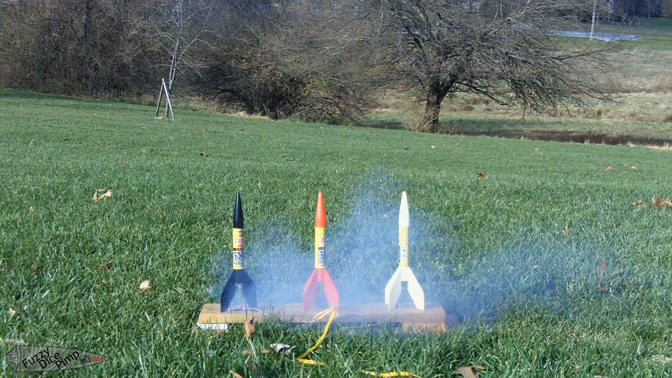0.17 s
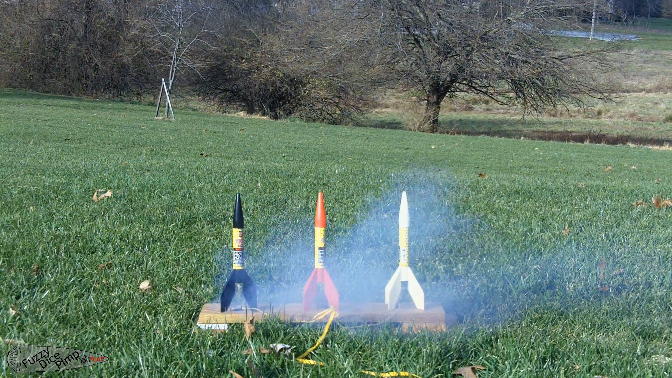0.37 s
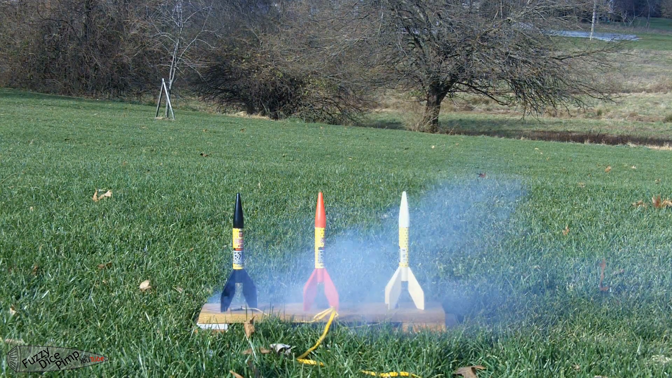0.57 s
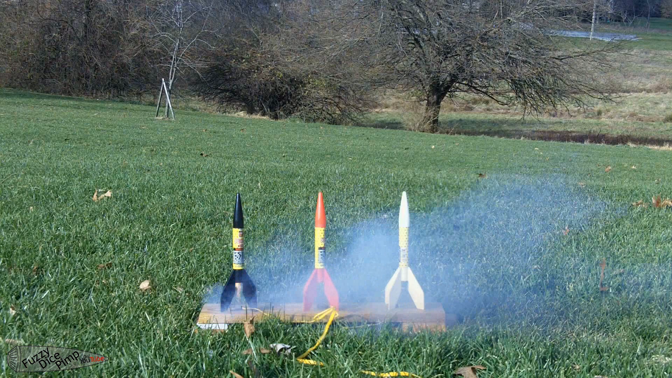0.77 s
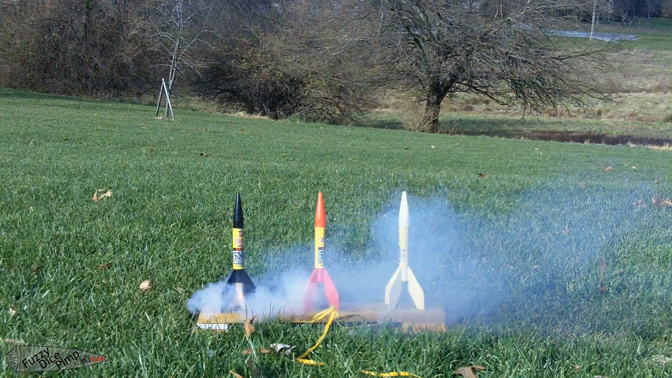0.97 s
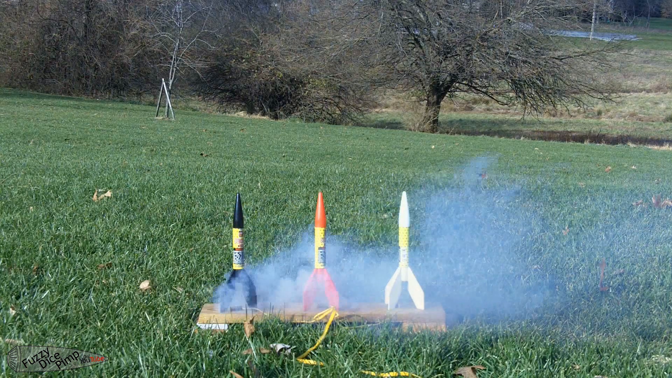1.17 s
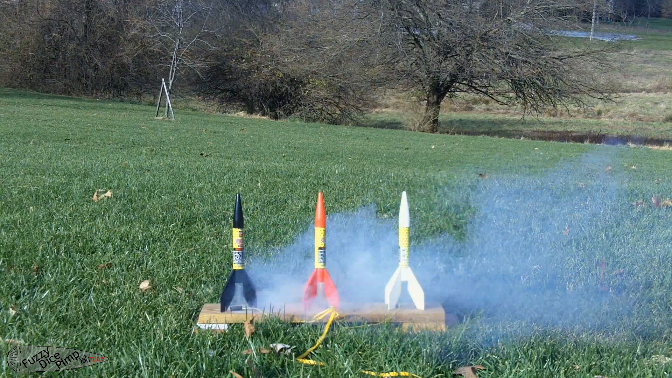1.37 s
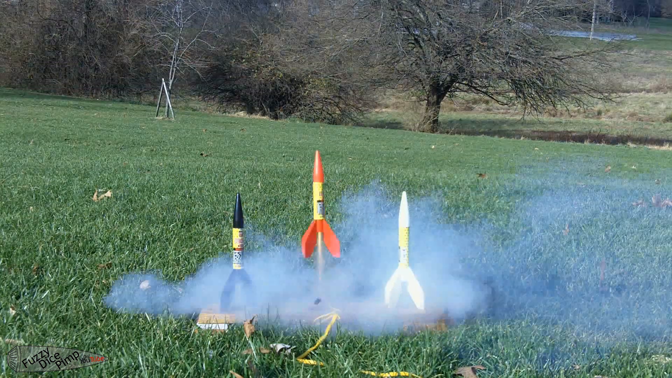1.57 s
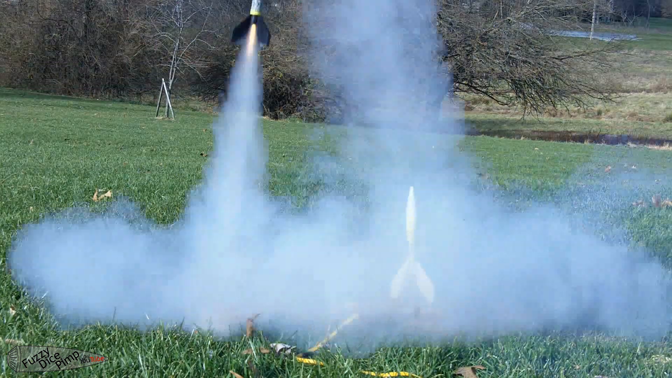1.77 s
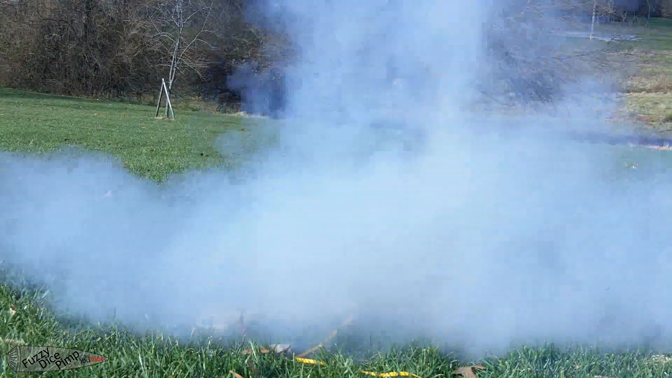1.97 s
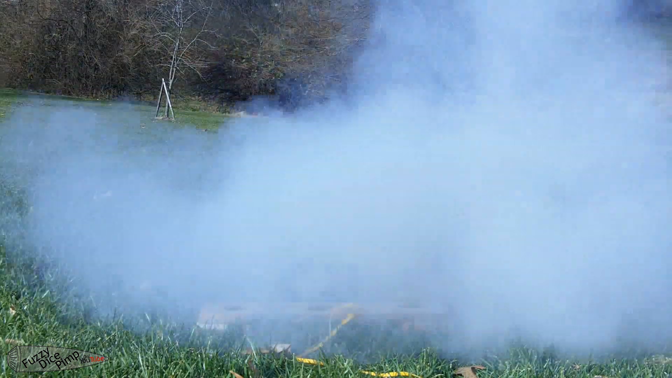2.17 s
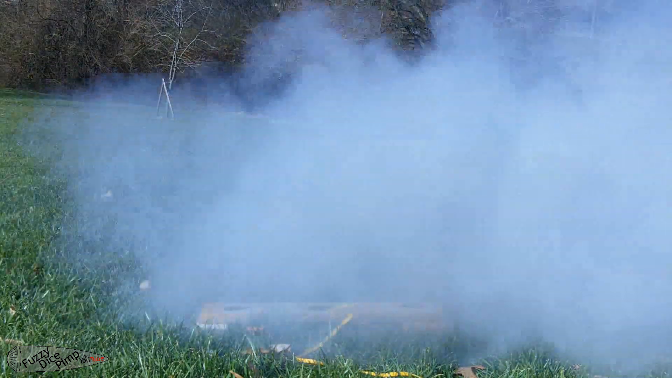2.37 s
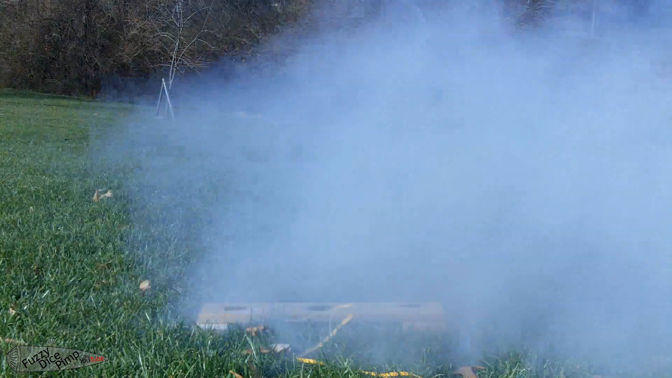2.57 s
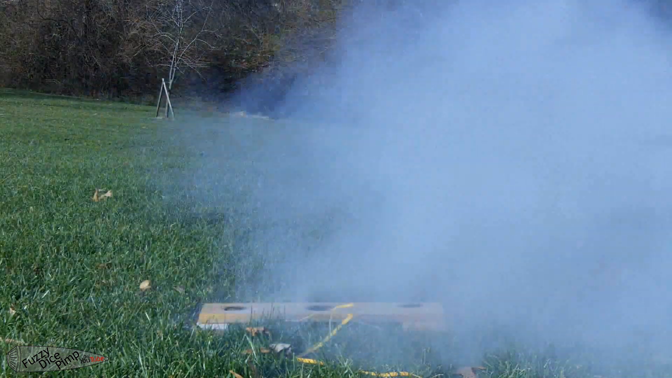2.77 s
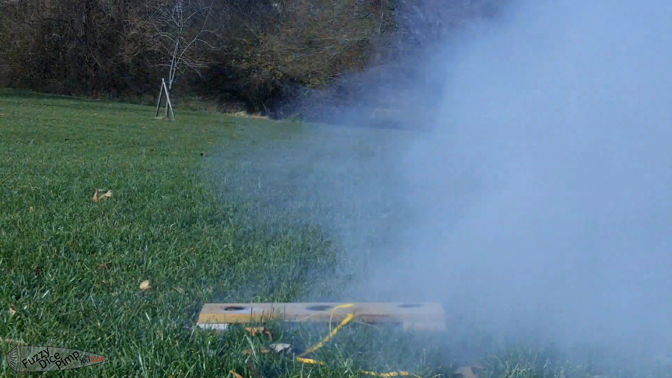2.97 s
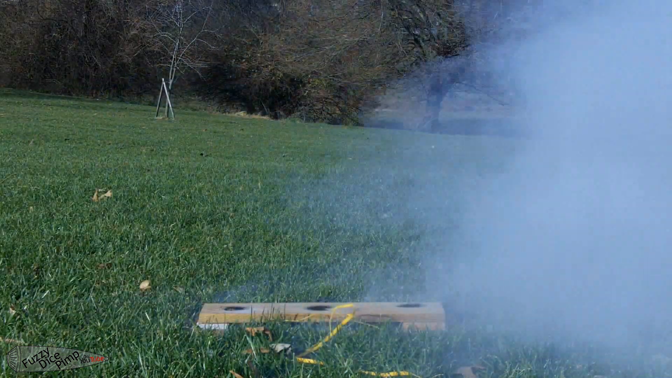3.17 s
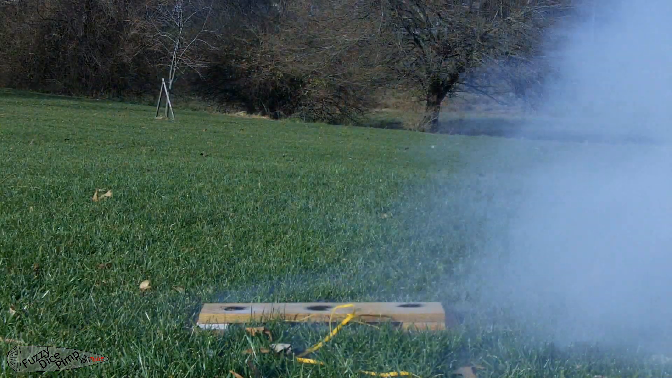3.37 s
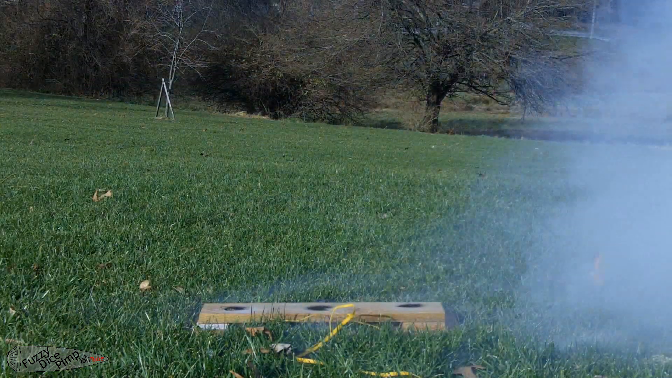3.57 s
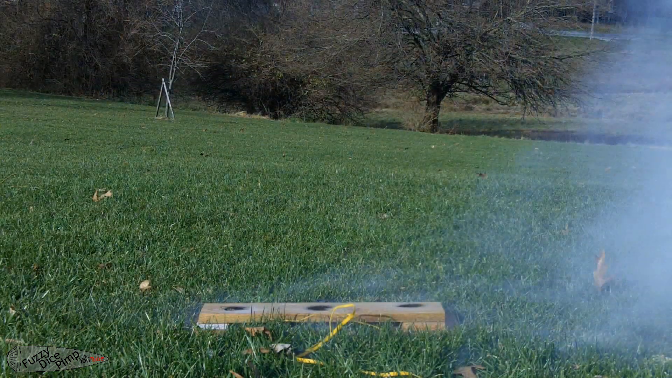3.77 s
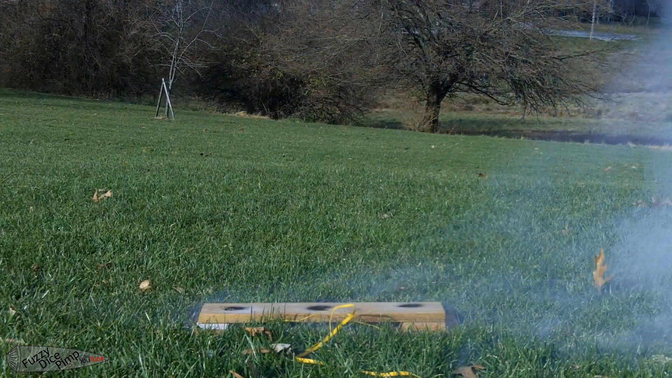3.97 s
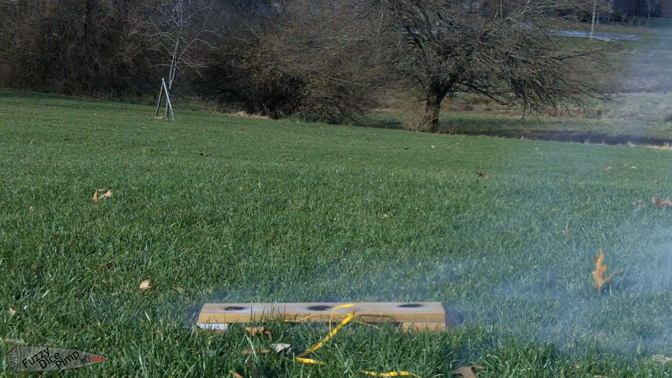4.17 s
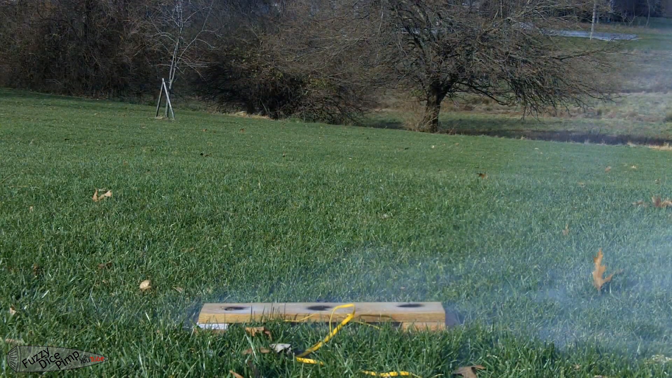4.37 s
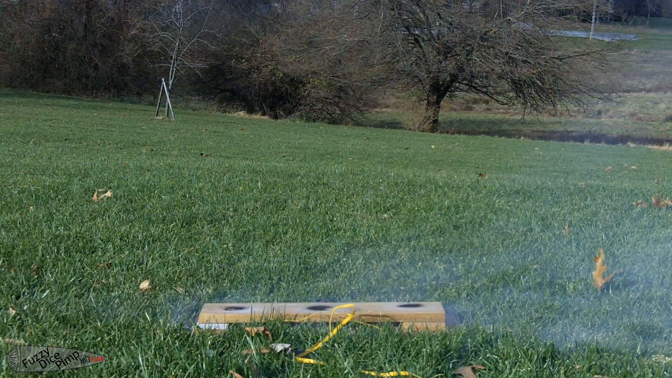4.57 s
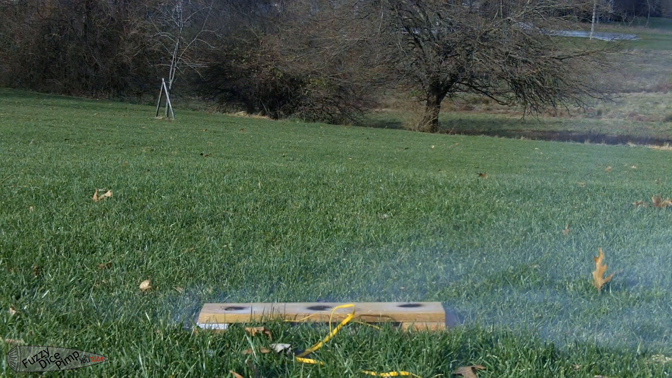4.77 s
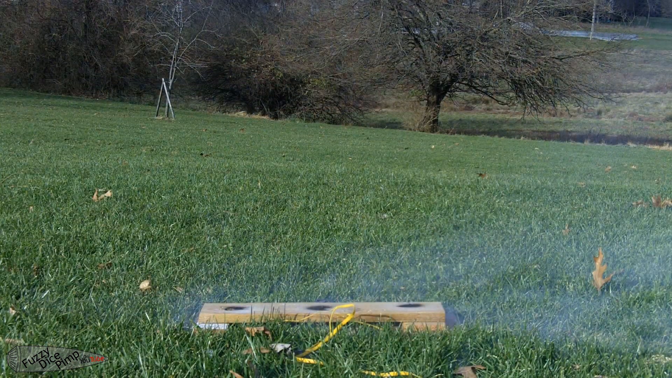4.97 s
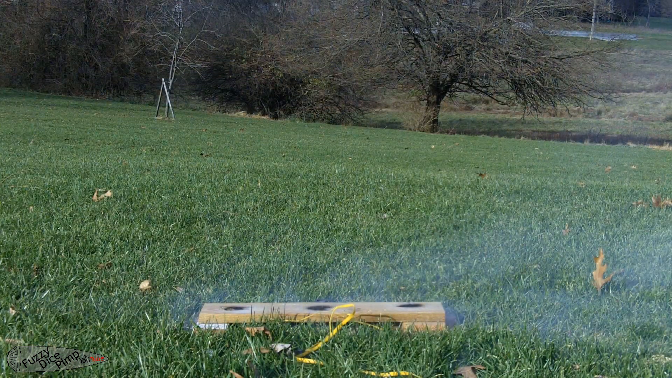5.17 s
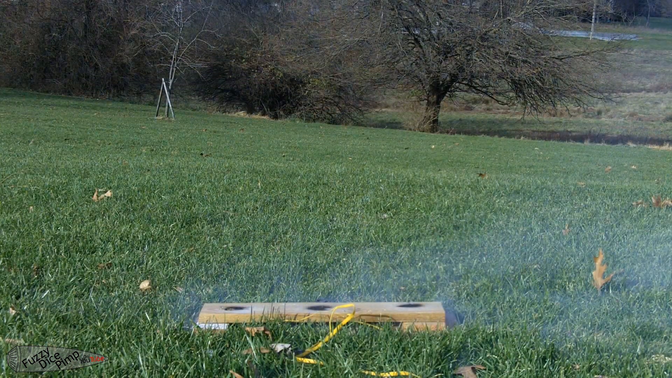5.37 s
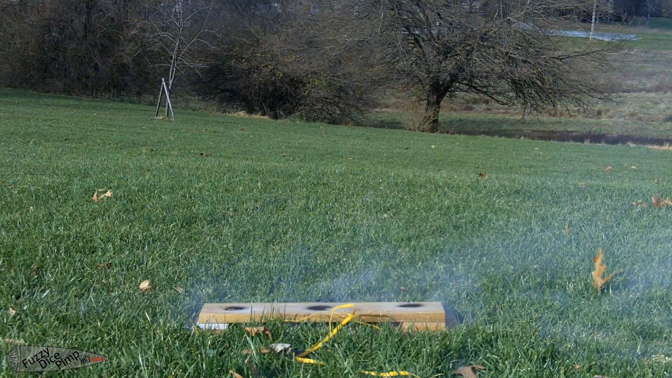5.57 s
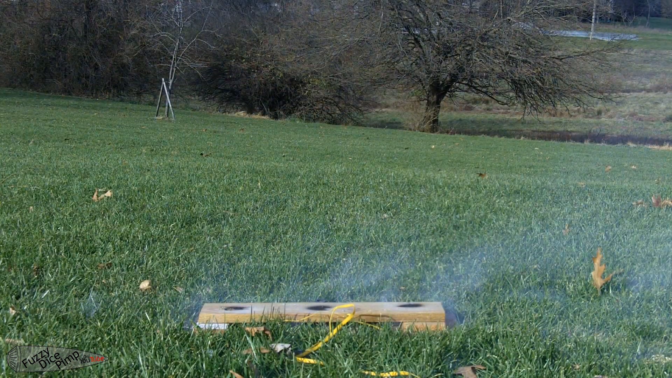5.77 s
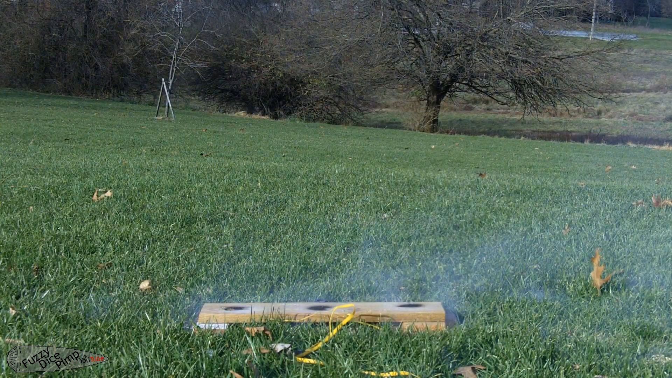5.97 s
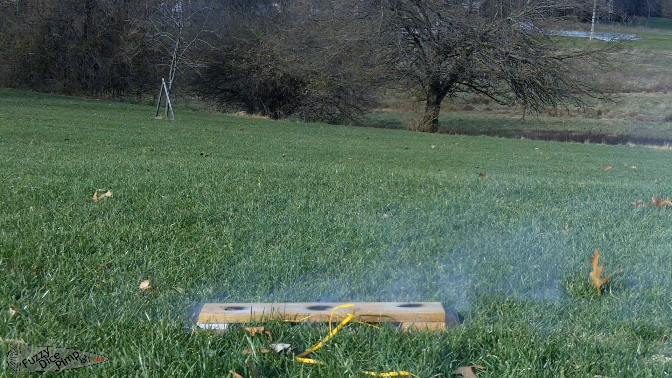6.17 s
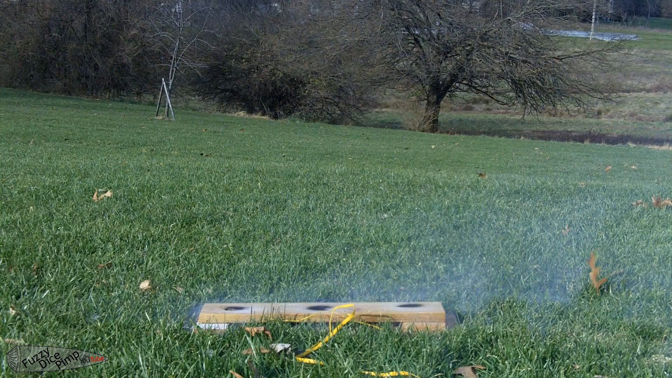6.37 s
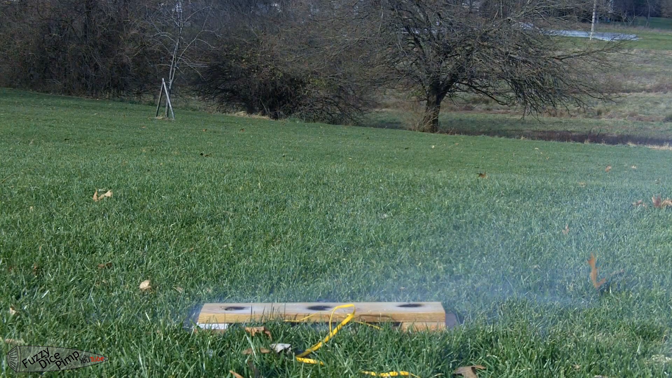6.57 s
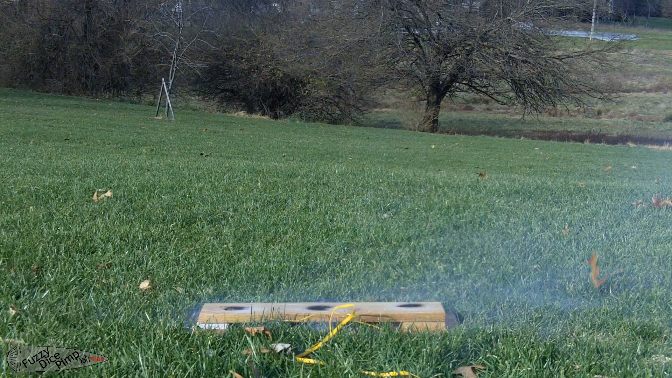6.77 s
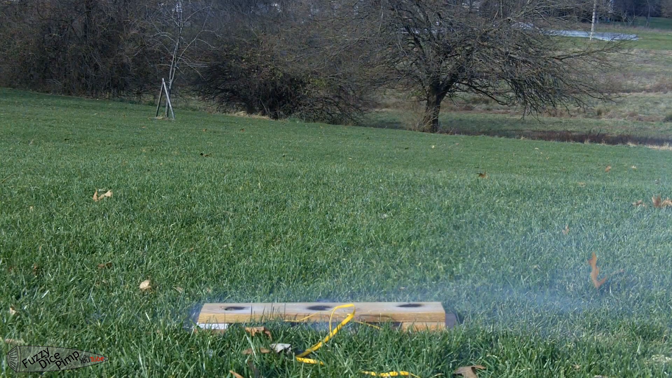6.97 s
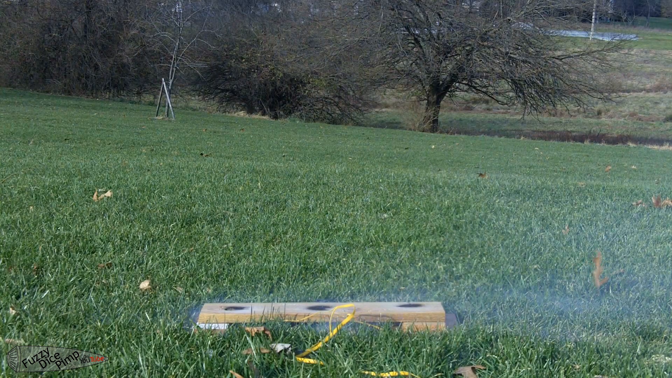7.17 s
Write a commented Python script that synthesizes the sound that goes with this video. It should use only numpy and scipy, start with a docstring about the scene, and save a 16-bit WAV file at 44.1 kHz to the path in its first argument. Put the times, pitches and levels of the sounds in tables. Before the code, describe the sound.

Outdoors, with a stereo microphone near the launch pad: weak hissing and sputtering, then a rapid surge as three rockets blast off almost together, bright and gritty with thudding chuffs. After under a second of roar, the background seems to duck, then only a fading, airy hiss remains high above. A quick, irregular volley of hard pops follows, leaving a long wash of echo among trees and a few low wind buffets.

```python
"""A breeze rumbles on the microphone in a hushed field, while three model rockets smoulder and sputter on a pad.
Then they roar off one after another: jets of noise, swept by their ground echo as they climb.
Far overhead they hiss on, as duller noise, until the ejection charges pop: short ringing pressure swings.
The woods return the pops as a long wash, made of fading bands of noise."""
import sys
import numpy as np
from scipy import signal
from scipy.fft import rfft, irfft
from scipy.io import wavfile

SR = 44100
rng = np.random.default_rng(int(sys.argv[2]) if len(sys.argv) > 2 else 0)


def bounce(signal):
    """Save signal as a 16-bit WAV file at the path given by the first command-line argument."""
    frames = np.transpose(np.atleast_2d(signal))
    limited = np.clip(frames, -1, 1)
    pcm = np.round(limited * 32767).astype(np.int16)
    wavfile.write(sys.argv[1], SR, pcm)


N = 318745
TIME = np.arange(N) / SR
FREQS = np.maximum(np.arange(N // 2 + 1) * SR / N, 1)
OVERHEAD_LAG_MS = 3.06   # how late the ground echo of a source straight above arrives


def from_db(db):
    """Turn decibels into a gain."""
    return 10 ** (np.asarray(db) / 20)


def rms_one(x):
    """Scale a sound to an average strength (rms) of 1."""
    return x / np.sqrt(np.mean(x ** 2) + 1e-20)


def noise(spectrum):
    """Noise with the given balance of low and high pitches, rms 1."""
    hz, db = np.transpose(spectrum)
    shape = from_db(np.interp(np.log(FREQS), np.log(hz), db))
    return rms_one(irfft(rfft(rng.standard_normal(N)) * shape, N))


def flutter(rate, depth_db):
    """A gain that wanders at random about rate times a second."""
    slow = irfft(rfft(rng.standard_normal(N)) / (1 + (FREQS / rate) ** 2), N)
    return from_db(depth_db * rms_one(slow))


def soften(x, hz, order=1):
    """Take away the treble above hz (low-pass)."""
    return signal.sosfilt(signal.butter(order, min(hz, .45 * SR), fs=SR, output="sos"), x)


def resonate(x, hz, width_hz):
    """Let one resonance ring, gain 1 at its top."""
    return signal.lfilter(*signal.iirpeak(hz, hz / width_hz, fs=SR), x)


def ground_echo(x, lag_ms, grass_hz):
    """A later copy off the ground, dulled by the grass."""
    return soften(np.interp(TIME - lag_ms / 1000, TIME, x, left=0), grass_hz)


def burn(start, end, sag_db, fade_db):
    """Gain of a burn: 1 at the start, sagging by sag_db a second, fading by fade_db a second on either side."""
    outside = np.maximum(start - TIME, 0) + np.maximum(TIME - end, 0)
    sag = sag_db * np.maximum(TIME - start, 0)
    return from_db(-sag - np.minimum(fade_db * outside, 200))


def levels(rows, fade_db=400):
    """Gain curves from rows of (time [s], level [dB], ..), fading by fade_db a second outside their span."""
    s, *columns = np.transpose(rows)
    inside = burn(s[0], s[-1], 0, fade_db)
    return [from_db(np.interp(TIME, s, column)) * inside for column in columns]


def humps(rows):
    """Sum of smooth rises and falls from rows of (time of the peak [s], level [dB], half-length [s])."""
    return sum(from_db(db) * np.exp(-np.minimum(((TIME - s) / length) ** 2, 40)) for s, db, length in rows)


def swell(s, length):
    """A quick rise to 1, reached after half the length, and a slower fall."""
    age = np.clip((TIME - s) / length, 0, 40)
    return 2 * age * np.exp(1 - 2 * age)


# around the roar the whole background sinks, stays low and creeps back
LULL_START_S, LULL_END_S, LULL_SINK_S, LULL_RETURN_S = 2.1, 2.85, 0.57, 0.65


def lull(depth_db):
    """Gain of a background sound that sinks by depth_db around the roar."""
    sinking = 1 + (TIME - LULL_START_S) / LULL_SINK_S
    returning = 1 - (TIME - LULL_END_S) / LULL_RETURN_S
    return from_db(-depth_db * np.clip(np.minimum(sinking, returning), 0, 1))


# hush of the field: (frequency [Hz], relative level [dB per Hz])
FIELD = [(40, -16), (150, 10.5), (300, 9), (480, 3.5), (1000, 9), (1600, -10), (2400, -33), (3500, -18.5),
         (6000, -29), (12000, -34), (15000, -45.5)]
HUSH_DB = -53.5


def field():
    """The hush of the open field is plain shaped noise, even except for the lull."""
    return from_db(HUSH_DB) * lull(depth_db=19) * noise(FIELD)


# wind rumble: (frequency [Hz], relative level [dB per Hz])
WIND = [(10, 6.5), (28, 2.5), (60, -6), (120, -13), (220, -30), (500, -50.5), (2000, -84), (15000, -125)]
# gusts on the microphone: (time of the peak [s], level [dB], half-length [s])
GUSTS = [(1.48, -39, 0.035), (3.48, -49, 0.052), (4.73, -38, .09), (6.27, -38, .14), (6.455, -18.5, 0.027),
         (6.54, -23, .035), (7.08, -31, .05)]
BREEZE_DB = -41


def wind(own_db=-14, own_hz=65, own_width_hz=150):
    """Breeze and gusts push both microphone ports alike; small steady eddies push them in opposite ways."""
    rumble = (from_db(BREEZE_DB) + humps(GUSTS)) * lull(depth_db=14) * noise(WIND)
    eddies = rms_one(resonate(noise(WIND), own_hz, own_width_hz))
    eddies *= from_db(BREEZE_DB + own_db) * lull(depth_db=7.5)
    return rumble + eddies * np.array([[1], [-1]])


# echo of the woods: (frequency [Hz], relative level [dB], time to fade by 60 dB [s])
WOODS = [(200, -14.5, 1.73), (470, 11, 0.8), (870, 3, 0.6), (1380, 6, 14.8), (2260, 7, 4.7),
         (3620, 12.5, 2.5), (6100, 9, 1.64), (12000, -10, 0.43)]


def woods(x, level_db=-21.0, tree_db=8, tree_s=0.13, tree_spread_s=0.058):
    """The nearest trees answer first, then the deep woods; each band of pitches fades at its own pace."""
    hz, db, t60 = np.transpose(WOODS)
    age = TIME[:N // 2]
    edges = np.geomspace(140, 14000, 14)
    wash = 0
    for low, high in zip(edges, edges[1:]):
        band_pass = signal.butter(2, [low, high], "band", fs=SR, output="sos")
        band = signal.sosfilt(band_pass, rng.standard_normal(len(age)))
        centre = np.log(low * high) / 2
        fall_db = 60 * age / np.interp(centre, np.log(hz), t60)
        wash = wash + band * from_db(np.interp(centre, np.log(hz), db) - fall_db)
    near_trees = from_db(tree_db * np.exp(-((age - tree_s) / tree_spread_s) ** 2))
    wash *= np.clip(age / 0.07, 0, 1) ** 2 * near_trees   # the echo builds up over 0.07 s
    return from_db(level_db) * signal.fftconvolve(x, wash / np.linalg.norm(wash))[:N]


# the distant jets: (frequency [Hz], relative level [dB per Hz])
FAR_JET = [(80, -2), (300, -6), (700, -1.5), (1300, -0.5), (2400, -3), (3400, -7), (5600, -15.5),
           (7500, -24.5), (10000, -33), (15000, -48)]
# smoke charges burn overhead, fainter as the rockets climb away
COAST_START_S, COAST_END_S, COAST_DB, COAST_SAG_DB_PER_S = 2.5, 5.75, -41.5, 3.5


def coast(echo_db=-5):
    """High overhead the hiss is dulled by the air and hollowed by a ground echo of nearly steady lag."""
    strength = burn(COAST_START_S, COAST_END_S, sag_db=COAST_SAG_DB_PER_S, fade_db=48)
    strength = from_db(COAST_DB) * strength * lull(depth_db=13.0)
    jet = strength * noise(FAR_JET) * flutter(15.2, depth_db=0.67)
    lag_ms = OVERHEAD_LAG_MS * flutter(.7, depth_db=0.22)
    return jet + from_db(echo_db) * ground_echo(jet, lag_ms, grass_hz=2630)


# ejection pops: (time [s], peak level of the direct blast [dB], pitch [Hz], first treble limit [Hz],
# ground echo lag [ms], echo level before the grass dulls it [dB], ragged tail level against the blast [dB])
POPS = [(4.9654, -21.5, 666, 504, 3.1, 3, 0), (5.1828, 6, 830, 5030, 3.1, 0, -7.5),
        (5.3934, 1.5, 740, 4160, 3.06, 1.5, -7.5), (5.4823, -2, 830, 3550, 3.03, 0.5, -11),
        (5.6689, -7.5, 676, 1480, 3.18, 0.5, -10.5), (5.7007, 3.5, 960, 3400, 2.8, -4, -14.5),
        (5.7942, -1, 1096, 4300, 2.84, -0.5, -13), (5.8310, -1.5, 1060, 2970, 3.01, -2, -14.5)]


def pops(damping=1.0, shock=0.22, thud=0.68, thud_hz=260, tail_s=0.0066, tail_hz=2200, low_cut_hz=170):
    """Each charge sends a shock front, a pressure swing with a rebound and a slower thud; the ground repeats them."""
    out, age = np.zeros(N), TIME[:SR // 20]
    for s, db, hz, edge_hz, lag_ms, echo_db, tail_db in POPS:
        start = round(s * SR)
        click = np.full(N, 1e-18)   # practically silent apart from one sample
        click[start] = -1
        swing = resonate(click, hz, damping * hz) + thud * resonate(click, thud_hz, 2 * thud_hz)
        front = shock * resonate(click, 10900, 4600)
        blast = soften(soften(swing + front, edge_hz), 4100)
        blast -= soften(blast, low_cut_hz)   # a small charge has no deep bass
        blast *= from_db(db) / np.abs(blast).max()
        out += blast + from_db(echo_db) * ground_echo(blast, lag_ms, grass_hz=3600)
        # ragged returns from the grass
        scatter = soften(rng.standard_normal(len(age)) * np.exp(-age / tail_s), tail_hz, order=2)
        scatter *= np.linalg.norm(blast) / np.linalg.norm(scatter)
        out[start:start + len(age)] += from_db(tail_db) * scatter
    return out


def ignition(s=1.064, length=0.076, level_db=-40, spit_db=-41, rush_db=-40, hz=550, width_hz=900):
    """The first igniter flares with a soft, hollow puff, a spit of hiss and a rush of roar."""
    puff = rms_one(soften(resonate(noise(ROAR), hz, width_hz), 580, order=2))
    flare = from_db(level_db) * puff + from_db(spit_db) * noise(HISS) + from_db(rush_db) * noise(ROAR)
    return swell(s, length) * flare


# resonances of the sizzle: (frequency [Hz], width before broadening [Hz], relative level [dB])
SIZZLE_MODES = [(5920, 310, -6.5), (7600, 680, -5), (8600, 380, -5.5)]
# thin sizzles of the nozzles catching: (time of the peak [s], relative level [dB], half-length [s])
SIZZLES = [(1.0, -48, 0.038), (1.21, -43, 0.063), (1.43, -42, 0.13)]


def sizzle(level_db=-5, broadening=1.3):
    """Gas squeezing past the igniters sputters in a few broad, high resonances, each wavering on its own."""
    gas = rng.standard_normal(N) * flutter(250, depth_db=1.0)
    song = 0
    for hz, width, db in SIZZLE_MODES:
        ringing = resonate(resonate(gas, hz, broadening * width), hz, broadening * width)
        song = song + from_db(db) * ringing * flutter(18, depth_db=1.5)
    return from_db(level_db) * humps(SIZZLES) * rms_one(song)


# thump of a chuff: (frequency [Hz], relative level [dB per Hz])
THUMP = [(20, -1.5), (70, -6), (150, -13), (400, -18.5), (1200, -26), (4000, -54.5)]
# chuffs of uneven burning: (start time [s], thump level [dB], spit level [dB], length [s])
CHUFFS = [(1.579, -50.5, -33, .04), (1.757, -36.5, -24.5, .024), (1.931, -20.5, -36, 0.048),
          (1.991, -9, -25.5, 0.0028), (2.077, -18.5, -23.5, 0.012), (2.126, -14.5, -23.5, 0.015),
          (2.171, -24, -22, 0.0036), (2.299, -22.5, -22, 0.0059)]


def chuffs():
    """Each surge of the burn gives a low thump and a spit of bright noise."""
    thump, spit = noise(THUMP), noise(HISS)
    out = 0
    for s, thump_db, spit_db, length in CHUFFS:
        out = out + swell(s, length) * (from_db(thump_db) * thump + from_db(spit_db) * spit)
    return out


# low roar of the motors, also used by the ignition: (frequency [Hz], relative level [dB per Hz])
ROAR = [(60, -11), (200, -6.5), (500, -3.5), (1000, -1.5), (2000, 1), (3500, 1.5), (6000, -13),
        (15000, -41)]
# nozzle hiss, also used by the ignition and chuffs: (frequency [Hz], relative level [dB per Hz])
HISS = [(500, -15), (1500, -51), (3000, -1.5), (5000, -1.5), (6100, -1.5), (7000, -5.5), (9000, -7.5),
        (12000, -16), (15000, -27.5)]
# thrust of the three motors, from catching to burn-out:
# (time [s], relative level of the low roar [dB], relative level of the nozzle hiss [dB])
THRUST = [(1.5, -56, -47.5), (1.582, -39.5, -34.5), (1.7, -34.5, -29.5), (1.78, -33.5, -20),
          (1.88, -29, -24.5), (1.95, -22.5, -16), (2.166, -16.5, -19), (2.232, -26.5, -21.5),
          (2.308, -21, -21.5), (2.462, -38, -40), (2.52, -54.5, -59)]
# when each rocket leaves the pad: (time [s])
LEAVE_S = [1.58, 1.79, 2.05]
CLIMB_S = .232   # time to climb as high as the pad is far
# before lift-off the nozzles smoulder, slowly weakening (levels relative, like the thrust)
SMOULDER_ROAR_DB, SMOULDER_HISS_DB, SMOULDER_SAG_DB_PER_S, SMOULDER_END_S = -45.5, -37.5, 3.5, 2


def launch(roar_db=-1, hiss_db=-7.5, echo_db=-2, catch_s=0.092):
    """Three turbulent jets; the nearest burning one leads, and its ground echo lags more as it climbs."""
    smoulder = burn(0, SMOULDER_END_S, sag_db=SMOULDER_SAG_DB_PER_S, fade_db=127)
    roar, hiss = levels(THRUST, fade_db=124)
    roar = np.hypot(roar, from_db(SMOULDER_ROAR_DB) * smoulder)
    hiss = np.hypot(hiss, from_db(SMOULDER_HISS_DB) * smoulder)
    out, total = 0, 0
    for leave in LEAVE_S:
        height = (np.maximum(TIME - leave, 0) / CLIMB_S) ** 2   # in pad distances
        distance = np.hypot(1, height)
        steepness = height / distance
        caught = np.clip((TIME - leave) / catch_s + 1, 0, 1)
        share = (.1 + caught) / distance
        jet = from_db(roar_db) * roar * noise(ROAR) * flutter(60, depth_db=1.0)
        jet += from_db(hiss_db) * hiss * noise(HISS) * flutter(70, depth_db=1.0)
        echo = ground_echo(jet, OVERHEAD_LAG_MS * steepness, grass_hz=4003)
        jet += from_db(echo_db) * steepness * echo
        out, total = out + share * jet, total + share ** 2
    return out / np.sqrt(total)   # the thrust table sets the level, the shares only the balance


def two_ports(x, apart_hz, lag_us=20):
    """Below apart_hz both ports hear the sound together; above it the left port hears it a little later."""
    lag = lag_us / 1e6 / (1 + (apart_hz / FREQS) ** 6)
    return np.array([irfft(rfft(x) * np.exp(-2j * np.pi * FREQS * lag), N), x])


def spread(x, unlike_hz, unlike_db):
    """A smeared copy of the sound, opposite in the two channels: faint throughout, strongest in the top treble."""
    smear = rng.standard_normal(SR // 25)
    smear /= np.linalg.norm(smear)
    width = from_db(unlike_db) + (FREQS / unlike_hz) ** 3
    return irfft(rfft(x) * rfft(smear, N) * width, N) * np.array([[1], [-1]])


def scene():
    """The launch straight ahead; coast, pops and their echoes from above and around; hush and wind."""
    pad = launch() + ignition() + sizzle() + chuffs()
    charges = pops()
    around = coast() + woods(charges) + field()
    width = spread(pad, unlike_hz=16000, unlike_db=-39)
    width += spread(around, unlike_hz=14000, unlike_db=-26.5)
    width += spread(charges, unlike_hz=26000, unlike_db=-28)
    return two_ports(pad, apart_hz=3925) + two_ports(charges + around, apart_hz=200) + width + wind()


def limiter(x, release_db_per_s=70, attack_hz=25):
    """Peaks over full scale are clipped; the gain ducks just after them and creeps back."""
    over_db = np.maximum(20 * np.log10(np.abs(x).max(axis=0) + 1e-9), 0)
    release_db = release_db_per_s * TIME
    held_db = np.maximum.accumulate(over_db + release_db) - release_db
    return np.clip(x * from_db(-soften(held_db, attack_hz)), -1, 1)


NOTCH_HZ, HOUSING_HZ, HOUSING_Q = 4228, 5592, 4.4
CUTOFF_HZ = 15300


def record(dry, rim=1.1, rim_width_hz=650, null_width_hz=260):
    """The microphone housing cancels one pitch and rings just above it; peaks are limited, the top is cut."""
    notch, ring = 2 * np.pi * NOTCH_HZ / SR, 2 * np.pi * HOUSING_HZ / SR   # radians per sample
    r = np.exp(-ring / (2 * HOUSING_Q))
    b = np.array([1, -2 * np.cos(notch), 1])
    a = np.array([1, -2 * r * np.cos(ring), r * r])
    coloured = signal.lfilter(b * a.sum() / b.sum(), a, dry)   # gain 1 in the deep bass
    coloured = coloured + rim * resonate(coloured, NOTCH_HZ, rim_width_hz)   # the null has steep walls
    coloured = coloured - resonate(coloured, NOTCH_HZ, null_width_hz)   # and a flat bottom
    top_cut = signal.ellip(10, .1, 80, CUTOFF_HZ, fs=SR, output="sos")
    return signal.sosfilt(top_cut, limiter(coloured))


dry = scene()
out = record(dry)
bounce(out)
```